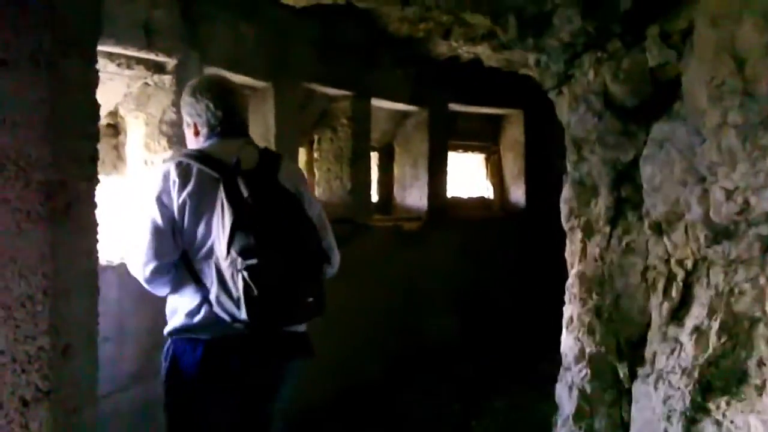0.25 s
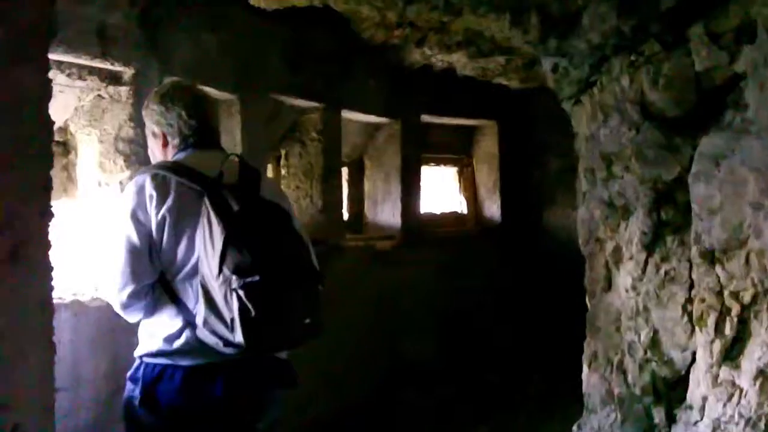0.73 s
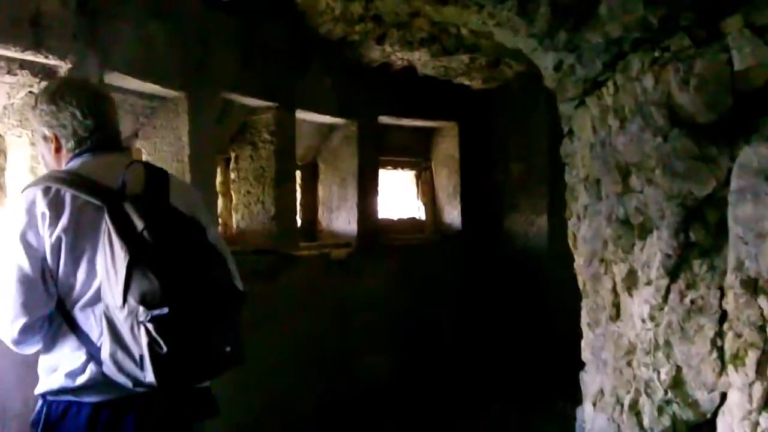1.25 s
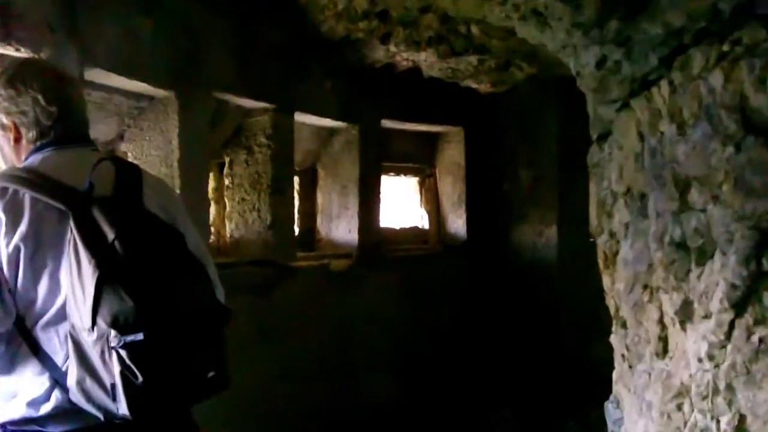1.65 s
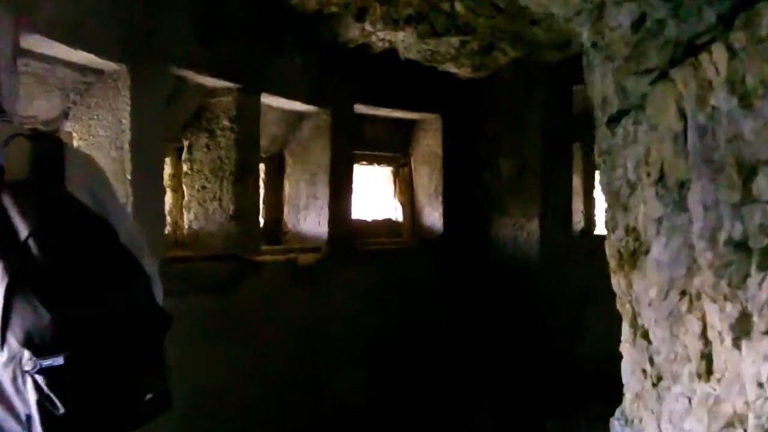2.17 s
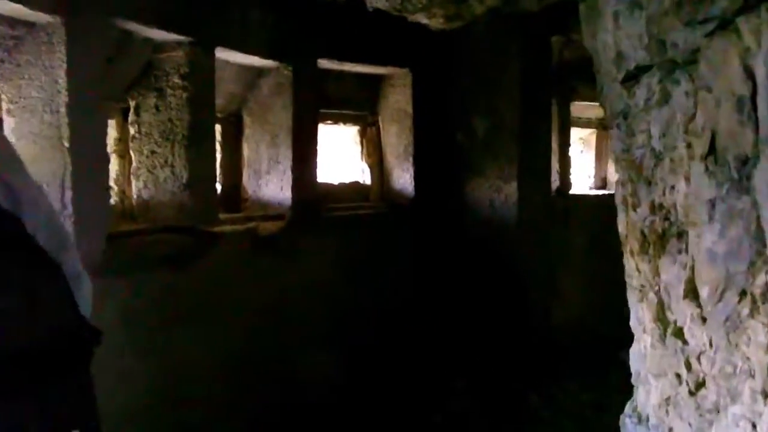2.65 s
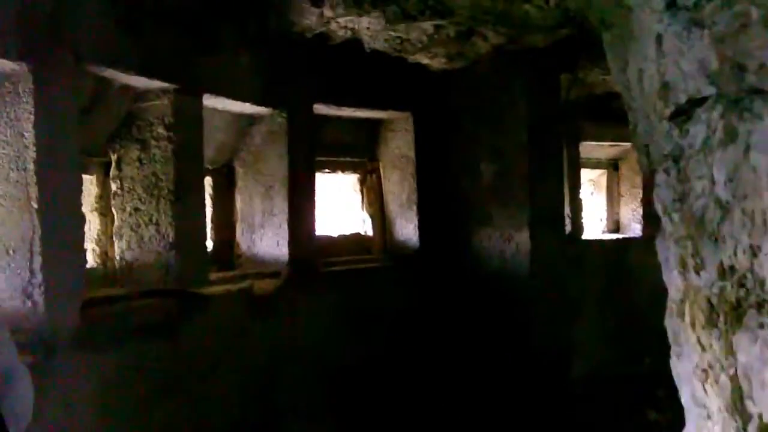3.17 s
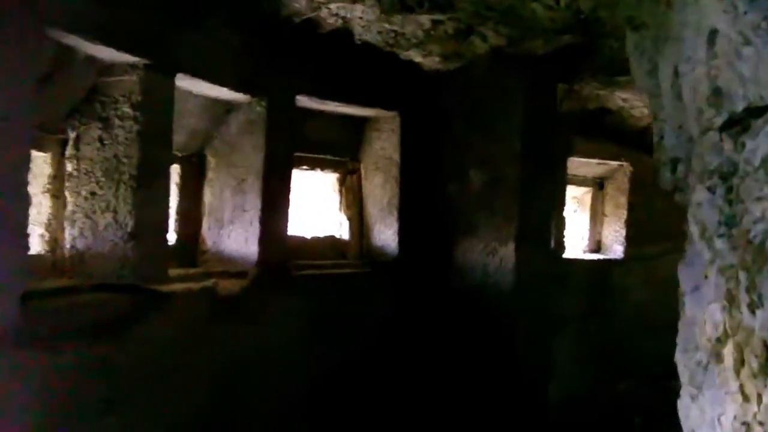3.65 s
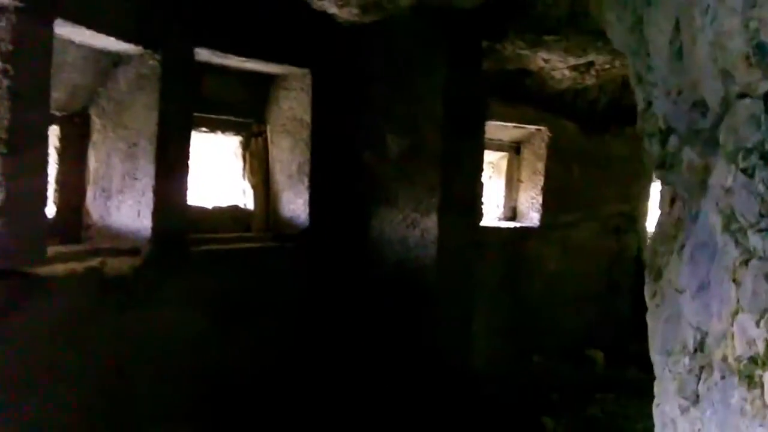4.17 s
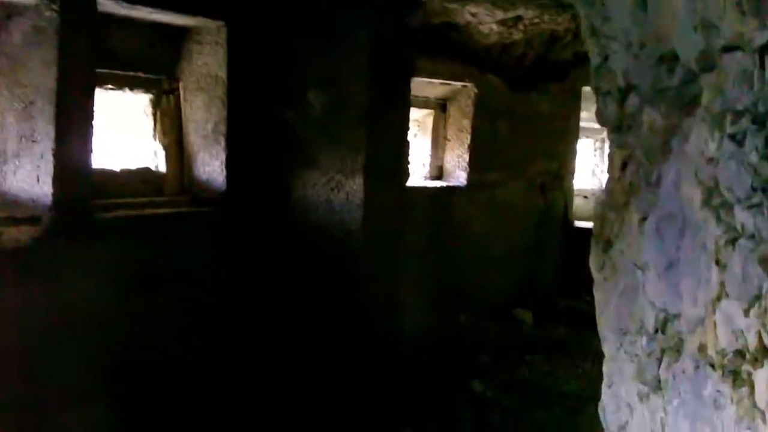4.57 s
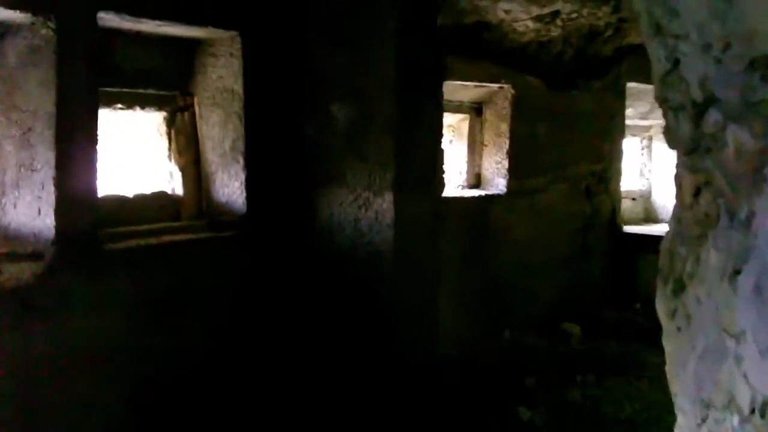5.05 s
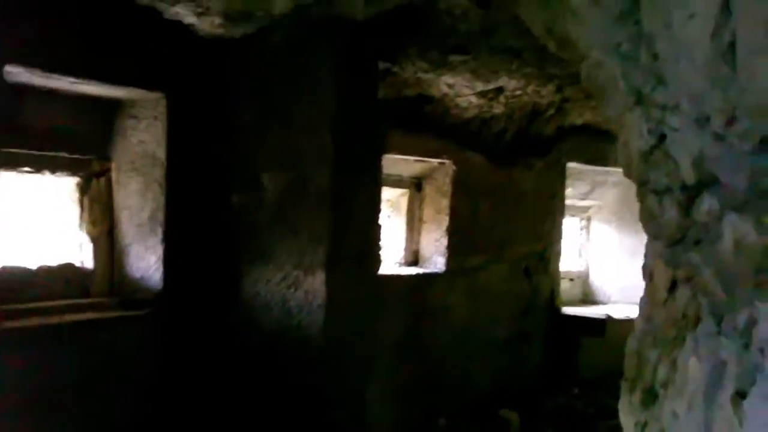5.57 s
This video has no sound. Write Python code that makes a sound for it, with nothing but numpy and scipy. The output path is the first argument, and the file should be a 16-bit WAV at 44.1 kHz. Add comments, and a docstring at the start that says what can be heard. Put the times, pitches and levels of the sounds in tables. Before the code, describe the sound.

Boots tread and scuff over loose rubble in a boomy rock tunnel, stones knocking dully, with handheld rumble and hiss, heard only on the left.

```python
"""Boots tread and scuff over rubble in a rock tunnel: thuds, knocking stones, sliding grit, a boomy echo.
Blows and clacks are damped sines, scuffs are grainy noise, rubble is thousands of tiny random clacks.
Decaying noise makes the echo. Slow noise and short swings rumble and bump the hand-held camera.
Only its left microphone works; the right input holds hiss and whine."""
import sys
import numpy as np
from scipy import signal
from scipy.fft import rfft, irfft, next_fast_len
from scipy.io import wavfile
from scipy.ndimage import uniform_filter1d, map_coordinates

SR = 44100
rng = np.random.default_rng(int(sys.argv[2]) if len(sys.argv) > 2 else 0)


def undo_db(level):
    """Turn decibels back into plain size, where 20 dB means ten times bigger."""
    steps = np.asarray(level, float) / 20
    return 10 ** steps


def transcribe(signal):
    """Save signal, clipped to [-1, 1], as a 16-bit WAV file at the path in sys.argv[1]."""
    frames = np.atleast_2d(signal).T
    limited = np.clip(frames, -1, 1)
    pcm = np.round(limited * 32767).astype(np.int16)
    wavfile.write(sys.argv[1], SR, pcm)


N = 256662

# Source levels (feet, handling) are relative: scene() doubles the left channel.
# Heel and toe blows: start_s, level_db, knock_hz, thump_above_knock_db
HEEL_TOE_BLOWS = [(0.128, -47, 520, -15), (0.14, -27.5, 184, -26), (0.504, -29.5, 300, -18),
                  (0.526, -24.5, 467, -6), (0.539, -28.5, 217, 0), (0.665, -31.5, 374, -9),
                  (1.022, -35.5, 92, -13), (1.098, -39, 337, -18), (1.245, -37, 403, -21),
                  (1.355, -24.5, 380, -20), (1.385, -21.5, 312, -20), (1.41, -17, 179, -21),
                  (1.471, -31, 166, -18), (1.578, -30.5, 142, -3), (2.011, -30, 386, -4),
                  (2.153, -31, 220, -7), (2.193, -25, 445, -27), (2.263, -30, 227, -33),
                  (2.328, -28.5, 500, -23), (2.881, -37, 475, -5), (2.962, -29, 486, -10.5),
                  (3.045, -19, 221, -15), (3.077, -28, 468, -4.5), (3.086, -23, 192, -22),
                  (3.188, -33, 237, -14), (3.513, -39.5, 250, 5), (3.768, -29.5, 136, -10),
                  (3.799, -37.5, 556, -22), (3.827, -33, 111, -21), (4.012, -36.5, 541, -6.5),
                  (4.748, -22.5, 319, -4), (4.813, -44, 90, -14), (5.258, -34.5, 424, -13),
                  (5.265, -27, 150, -15), (5.614, -28.5, 344, -1.5), (5.634, -26.5, 218, 1.5),
                  (5.702, -27, 157, -25)]
# Floor thump: pitch_hz, level_db, t60_s
FLOOR_MODES = [(90, -9, 0.11), (150, -3, 0.13), (171.4, -11.5, 0.16)]
# Single stones clacking: start_s, level_db, pitch_hz, snap_above_ring_db
STONE_CLACKS = [(0.136, -45, 904, 7), (0.254, -29.5, 978, -14), (0.332, -43, 1353, -13),
                (0.528, -26.5, 652, -14), (0.666, -37, 790, -13), (1.245, -44.5, 810, -3),
                (1.299, -43.5, 700, -16), (1.354, -51, 930, 13), (1.399, -37, 770, -6),
                (1.56, -44, 837, -18), (1.961, -37.5, 835, -25), (2.015, -48.5, 1274, -1.5),
                (2.101, -42, 1316, -19), (2.154, -34, 850, -22), (2.202, -32, 667, -16),
                (2.265, -37, 900, -16), (2.33, -40, 916, -9), (2.884, -42, 703, -18),
                (2.906, -40, 723, -15), (2.968, -36, 680, -16), (3.078, -31.5, 934, -21),
                (3.191, -47, 770, -13), (3.226, -43.5, 1048, -12), (3.509, -46, 1276, -15),
                (3.774, -37.5, 780, 0.5), (3.801, -51, 610, 4), (3.821, -42, 630, -4), (3.934, -65, 900, 8),
                (3.987, -34.5, 587, -10), (4.013, -30, 796, -10.5), (4.039, -38.5, 946, -20),
                (4.749, -36.5, 867, -18), (4.888, -38, 990, -6), (4.961, -47, 1325, -16),
                (5.261, -48, 805, -14), (5.617, -46.5, 720, -7), (5.64, -46, 720, -15)]
# Grit dragged by a sole: start_s, stroke_db, treble_above_mids_db
SOLE_SCUFFS = [(0.119, -36.5, -4), (0.202, -48.5, -4), (0.252, -39.5, -27), (0.332, -40, -21),
               (0.459, -46, -25), (0.503, -42.5, -15), (0.517, -36.5, -4.5), (0.978, -42, -14),
               (1.032, -45.5, -5.5), (1.181, -48, -10), (1.24, -43.5, -8), (1.358, -37, -8),
               (1.387, -38.5, -9), (1.44, -38, -16), (1.551, -35, -0.5), (1.58, -40.5, -8.5),
               (1.805, -60.5, 4), (2.087, -49, -11), (2.154, -44, -11), (2.195, -46, -7),
               (2.687, -43.5, -16.5), (3.076, -54.5, 4), (3.512, -49, -7.5), (3.772, -39, -17),
               (3.931, -41, -33), (3.986, -50, -18), (4.015, -41.5, -17), (4.89, -43.5, -22),
               (5.636, -49.5, -12), (5.699, -52, -5)]
# Grit spectra, relative density: freq_hz, density_db
GRIT_MID_SPECTRUM = [(300, 21), (1000, 12.5), (2500, 6), (4000, -12), (7000, -28), (15000, -64)]
GRIT_TOP_SPECTRUM = [(2500, -14.5), (4700, 3.5), (6500, 0), (9500, 1), (12000, -8.5), (15500, -20)]
# Weight rolling onto loose rubble: full_s, held_s, big_stones_db, small_stones_db
WEIGHT_SHIFTS = [(0.0, 0.16, -48, -53), (0.58, 0.057, -47, -51), (1.0, 0.35, -57.5, -64.5),
                 (1.362, 0.12, -40.5, -49.5), (1.56, .03, -37.5, -55.5), (1.78, 0.028, -51, -62),
                 (2.03, 0.24, -44.5, -53.5), (2.4, 0.015, -56, -61.5), (2.92, 0.079, -64, -59),
                 (3.07, 0.12, -45.5, -61), (3.22, 0.023, -50.5, -55.5), (3.81, 0.25, -58, -69),
                 (4.88, 0.049, -58, -64), (5.36, 0.089, -63, -69.5)]
# Tunnel resonances: centre_hz, width_hz, level_db
TUNNEL_MODES = [(97, 18.3, 6.5), (164.6, 18, -4.5), (249, 34, -22), (387, 41, 6.5), (463, 82, 8),
                (790, 95, -13.5)]
# Tunnel decay: freq_hz, t60_s
TUNNEL_DECAY = [(100, 0.53), (400, 0.24), (1500, 0.62), (5000, 0.45), (12000, 0.14)]
# Knocks on the camera body: middle_s, level_db, push_hz
CAMERA_BUMPS = [(0.205, -40, 53), (0.532, -38, 65), (1.225, -22.5, 59), (1.393, -33, 67.5),
                (1.563, -44, 74), (1.705, -29.5, 55.3), (1.817, -36, 53.7), (1.878, -29.5, 52),
                (2.19, -34, 46.7), (2.249, -41, 38), (2.361, -36.5, 43), (2.45, -32.5, 36.5),
                (4.76, -35, 74), (5.645, -37, 74)]
# Rumble through the camera body: time_s, level_db
GRIP_LEVEL = [(0.0, -49.5), (0.15, -45.5), (0.6, -47.5), (1.0, -54), (1.4, -45.5), (1.7, -49.5),
              (2.17, -51.5), (2.41, -46.5), (2.55, -58), (2.75, -56), (3.1, -55), (3.5, -62), (3.94, -48),
              (4.2, -54.5), (4.7, -62.5), (5.0, -47.5), (5.5, -62), (5.82, -52)]
# Rumble spectrum, relative density: freq_hz, density_db
RUMBLE_SPECTRUM = [(10, -3.5), (25, 3.5), (50, -10.5), (90, -0.5), (200, -49), (500, -45)]
# Input hiss spectrum, relative density: freq_hz, density_db
HISS_SPECTRUM = [(15, -33), (65, 3.5), (150, 0), (400, -6), (1200, -13), (2600, -17), (4700, -21.5),
                 (7000, -25.5), (11000, -27), (15000, -28.5)]
# Recorder dips: centre_hz, width_hz, depth_db
RECORDER_DIPS = [(1977, 680, 9), (3950, 1430, 9.5), (5760, 1030, 10.5), (7920, 950, 10)]
# Circuit whine tones: pitch_hz
WHINE_TONES_HZ = [5867, 7703, 7762.5, 7822, 7882, 7941.7, 9777.7, 9837.7, 11795]
# Whine levels, one row per tone: left_peak_db, right_peak_db
WHINE_PEAKS_DB = [(-84, -107), (-89, -101), (-86, -98), (-80.5, -87), (-80, -88), (-92, -99), (-80.5, -107),
                  (-76.5, -100), (-89, -108)]

# t60 = least + cycles / pitch; damp = t60 drop in dB per dB of level
KNOCK_LEAST_S, KNOCK_CYCLES, KNOCK_DAMP, USUAL_BLOW_DB = 0.049, 6.6, 0.24, -29.5
CLACK_T60_S, CLACK_DAMP, USUAL_CLACK_DB, SNAP_T60_S = 0.054, 0.44, -40.5, 0.017
# swell = rise growth in dB per dB of level
DRAG_RISE_S, DRAG_T60_S, DRAG_SWELL, USUAL_DRAG_DB = 0.0079, 0.14, 0.49, -46.5
LOAD_DB_PER_S, SETTLE_DB_PER_S = 190, 129
REST_BIG_DB, REST_SMALL_DB = -61.5, -72  # rubble creeping between steps
ECHO_DB, TOP_HZ = -8.5, 15270


def unit(x):
    """Scale to rms 1."""
    return x / np.sqrt(np.mean(x ** 2, -1, keepdims=True) + 1e-20)


def along(points, hz):
    """Interpolate (freq_hz, value) points on a log axis."""
    f, v = np.transpose(points)
    return np.interp(np.log(hz + 1), np.log(f + 1), v)


def filtered(x, response):
    """x through a complex response of frequency."""
    n = x.shape[-1]
    m = next_fast_len(n + 8192)
    return irfft(rfft(x, m) * response(np.fft.rfftfreq(m, 1 / SR)), m)[..., :n]


def shaped(x, spectrum):
    """x coloured by a spectrum table, rms 1."""
    return unit(filtered(x, lambda hz: undo_db(along(spectrum, hz))))


def resonance(hz, centre_hz, width_hz):
    """Causal response of one resonance, 1 at its centre."""
    return 1j * hz * width_hz / (centre_hz ** 2 - hz ** 2 + 1j * hz * width_hz)


def placed(start_s, sound, rise_s):
    """A track holding one sound, with a soft start."""
    track, t = np.zeros(N + SR), np.arange(len(sound)) / SR
    soft = np.sin(np.pi / 2 * np.clip(t / rise_s, 0, 1)) ** 2
    track[round(start_s * SR):][:len(t)] = sound * soft
    return track


def stones(count, centre_hz, spread, cycles, size_db):
    """Random clacks: short damped sines of scattered pitch and size, rms 1."""
    draw = rng.random((count, 3))
    hz = centre_hz * np.exp(spread * rng.standard_normal((count, 1)))
    t = np.arange(1000) / SR
    size = undo_db(-size_db * np.log(1 - draw[:, 1:2])) * np.sign(draw[:, 2:] - 0.5)
    soft = 1 - np.exp(-t * hz * 2)  # rounded stones meet softly
    clack = size * np.sin(2 * np.pi * hz * t) * np.exp(-t * hz / cycles) * soft
    at = (draw[:, :1] * N).astype(int) + np.arange(len(t))
    return unit(np.bincount(at.ravel(), clack.ravel(), N + len(t))[:N])


def blows():
    """Each blow knocks a few rough cycles over a floor thump; harder ones jam the stones and die sooner."""
    out, t = np.zeros(N + SR), np.arange(SR // 3) / SR
    for start_s, db, knock_hz, thump_db in HEEL_TOE_BLOWS:
        t60_s = (KNOCK_LEAST_S + KNOCK_CYCLES / knock_hz) * undo_db(-KNOCK_DAMP * (db - USUAL_BLOW_DB))
        wander = uniform_filter1d(rng.standard_normal(len(t)), size=40)
        drift = knock_hz / 3500 * np.cumsum(wander)  # loose stones keep no steady phase
        knock = np.sin(2 * np.pi * knock_hz * t + drift) * undo_db(-60 * t / t60_s)
        thump = 0
        for hz, level_db, ring_s in FLOOR_MODES:
            mode_db = level_db + 2.08 * rng.standard_normal()
            thump = thump + np.sin(2 * np.pi * hz * t) * undo_db(mode_db - 60 * t / ring_s)
        out += placed(start_s, undo_db(db) * (knock + undo_db(thump_db) * thump), rise_s=0.0035)
    return out[:N]


def clacks():
    """A stone rings in a dull crack with a short bright snap; harder clacks ring and crack for less time."""
    out, t = np.zeros(N + SR), np.arange(SR // 4) / SR
    for start_s, db, hz, snap_db in STONE_CLACKS:
        t60_s = CLACK_T60_S * undo_db(-CLACK_DAMP * (db - USUAL_CLACK_DB))
        wander, dull, bright = rng.standard_normal((3, len(t)))
        drift = 0.14 * np.cumsum(uniform_filter1d(wander, size=20))
        ring = np.sin(2 * np.pi * hz * t + drift)
        crack = 0.51 * unit(filtered(dull, lambda f: resonance(f, 700, 750) ** 2))
        snap = unit(filtered(bright, lambda f: 0.4 * resonance(f, 2340, 500) + resonance(f, 3350, 800)))
        body = undo_db(db - 60 * t / t60_s) * (ring + crack)
        edge = undo_db(db + snap_db - 60 * t / SNAP_T60_S) * snap
        out += placed(start_s, body + edge, rise_s=0.0033)
    return out[:N]


def scuffs():
    """Grainy hiss swells as the sole drags, then dies away; heavier drags swell slower."""
    mid_gain, top_gain, t = np.zeros(N + SR), np.zeros(N + SR), np.arange(SR // 2) / SR
    for start_s, db, top_db in SOLE_SCUFFS:
        rise_s = DRAG_RISE_S * undo_db(DRAG_SWELL * (db - USUAL_DRAG_DB))
        stroke = undo_db(db - 60 * t / DRAG_T60_S) * (1 - np.exp(-t / rise_s))
        mid_gain[round(start_s * SR):][:len(t)] += stroke
        top_gain[round(start_s * SR):][:len(t)] += stroke * undo_db(top_db)
    clump_db = 2.2 * rng.standard_normal(N // 40 + 1).repeat(40)[:N]  # about 1 ms each
    grains = rng.standard_normal(N) * undo_db(clump_db)
    mid, top = shaped(grains, GRIT_MID_SPECTRUM), shaped(grains, GRIT_TOP_SPECTRUM)
    # pebbles ring inside the hiss
    mid += 0.24 * stones(count=3000, centre_hz=3020, spread=0.25, cycles=2.0, size_db=0.0)
    top += 0.23 * stones(count=3500, centre_hz=5510, spread=0.26, cycles=19.0, size_db=1.1)
    return mid * mid_gain[:N] + top * top_gain[:N]


def rubble():
    """Big and small stones grind and knock, swelling and dying as weight shifts."""
    full_s, held_s, big_db, small_db = np.transpose(WEIGHT_SHIFTS)[..., None]
    t = np.arange(N) / SR
    load_db = -LOAD_DB_PER_S * np.clip(full_s - t, 0, None)
    settle_db = -SETTLE_DB_PER_S * np.clip(t - full_s - held_s, 0, None)
    shape_db = load_db + settle_db
    big = stones(count=4000, centre_hz=250, spread=0.4785, cycles=1.82, size_db=1.58)
    small = stones(count=4900, centre_hz=800, spread=0.38, cycles=1.4, size_db=1.4)
    big_gain = undo_db(REST_BIG_DB) + undo_db(big_db + shape_db).max(0)
    small_gain = undo_db(REST_SMALL_DB) + undo_db(small_db + shape_db).max(0)
    return big_gain * big + small_gain * small


def tunnel(x):
    """Rock walls answer with decaying noise; each third of a second the walker has moved: new pattern."""
    out, step = np.zeros(N + 2 * SR), SR // 3
    for k in range(0, N, step):
        hz, t, z = signal.stft(rng.standard_normal(SR * 3 // 4), SR, nperseg=256)
        decay = undo_db(-60 * t / along(TUNNEL_DECAY, hz)[:, None])
        tail = signal.istft(z * decay, SR, nperseg=256)[1]
        wet = signal.fftconvolve(x[k:k + step], tail / np.linalg.norm(tail))
        out[k + 200:][:len(wet)] += wet  # delay in samples

    def boom(f):
        return 0.87 + sum(undo_db(db) * resonance(f, c, w) for c, w, db in TUNNEL_MODES)
    return filtered(out[:N], boom)


def handling():
    """A lumpy noise rumble through the camera body, and single soft pushes."""
    time_s, rumble_db = np.transpose(GRIP_LEVEL)
    lumps_db = map_coordinates(rng.standard_normal(N // 4000 + 4), [np.arange(N) / 4000])
    gain = undo_db(np.interp(np.arange(N) / SR, time_s, rumble_db) + lumps_db)
    rumble = shaped(rng.standard_normal(N), RUMBLE_SPECTRUM)
    out = np.pad(gain * rumble, (0, SR))
    t = np.arange(SR // 8) / SR
    for middle_s, db, hz in CAMERA_BUMPS:
        turns = (t - t[-1] / 2) * hz  # about one swing: inward, then back
        push = np.sin(2 * np.pi * turns - 0.8) * np.exp(-(turns / 0.39) ** 2)
        out[round((middle_s - t[-1] / 2) * SR):][:len(t)] += undo_db(db) * push
    return out[:N]


def hiss():
    """Independent coloured noise of the two inputs."""
    rms_db = np.array([[-54.5], [-53.5]])
    return undo_db(rms_db) * shaped(rng.standard_normal((2, N)), HISS_SPECTRUM)


def dipped(x):
    """Four fixed resonant dips and a band limit."""
    def response(f):
        dips = [1 - (1 - undo_db(-db)) * resonance(f, c, w) for c, w, db in RECORDER_DIPS]
        return (f < TOP_HZ) * np.prod(dips, 0)
    return filtered(x, response)


def whine():
    """Steady circuit tones, stronger on the left, with random phases."""
    t, out = np.arange(N) / SR, 0
    for hz, peaks_db in zip(WHINE_TONES_HZ, WHINE_PEAKS_DB):
        gain = undo_db(np.array(peaks_db)[:, None])
        out = out + gain * np.sin(2 * np.pi * (hz * t + rng.random((2, 1))))
    return out


def scene():
    """Feet, echo and handling, all on the left microphone only."""
    feet = rubble() + blows() + clacks() + scuffs()
    left = feet + undo_db(ECHO_DB) * tunnel(feet) + handling()
    return np.array([2 * left, 0 * left])


def band_limit(x):
    """A steep low-pass at the top of the band."""
    return signal.sosfilt(signal.butter(12, 15500, fs=SR, output="sos"), x)


def record(dry):
    """Add input hiss, cut the dips and the top, add circuit whine."""
    mix = dipped(dry + hiss()) + whine()
    return band_limit(mix)


dry = scene()
out = record(dry)
transcribe(out)
```